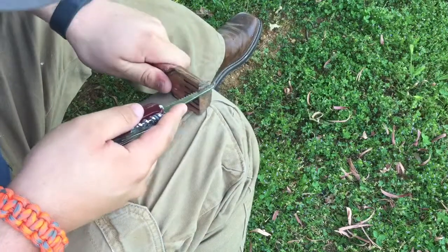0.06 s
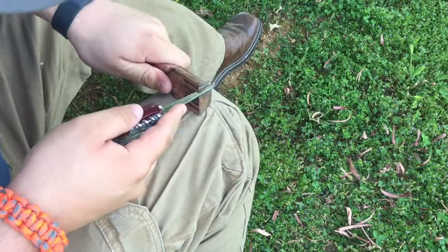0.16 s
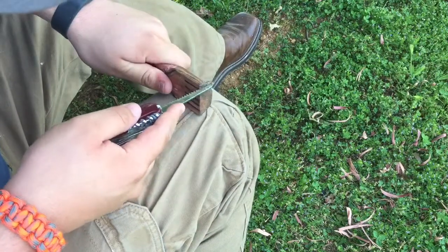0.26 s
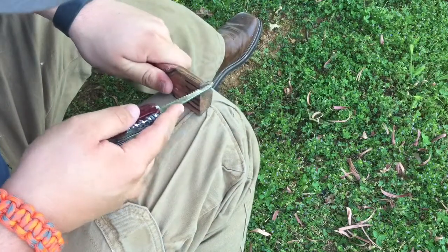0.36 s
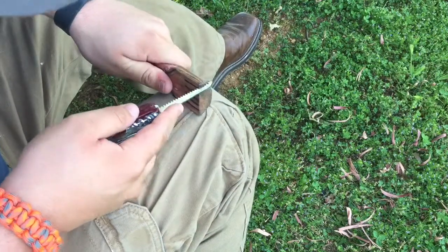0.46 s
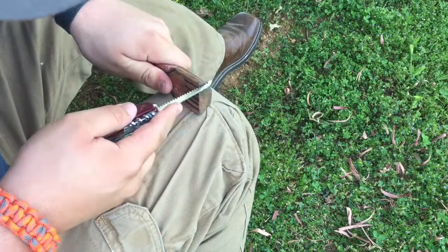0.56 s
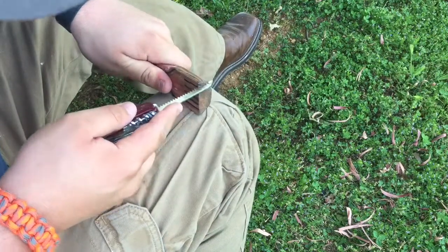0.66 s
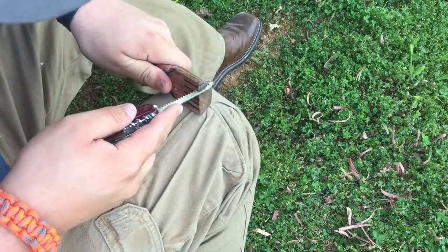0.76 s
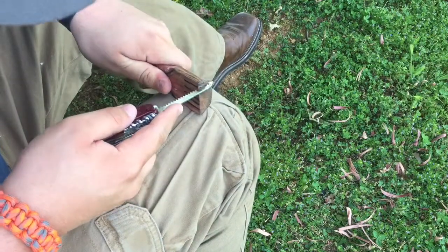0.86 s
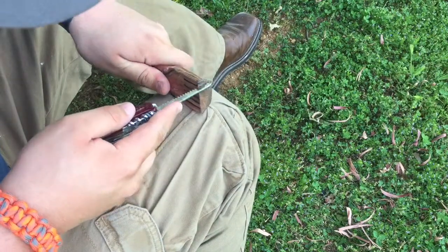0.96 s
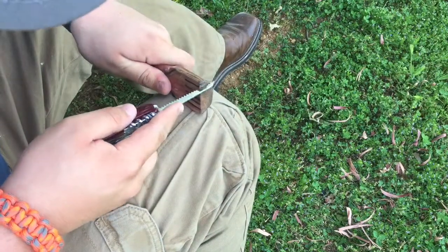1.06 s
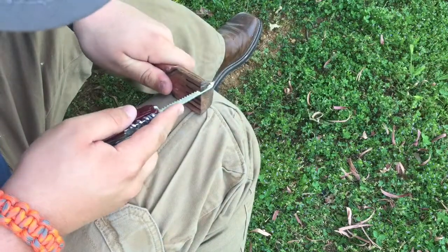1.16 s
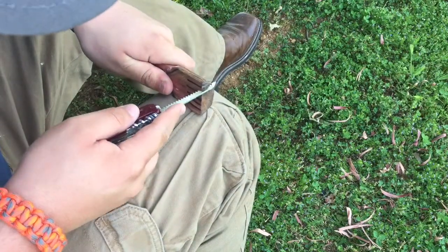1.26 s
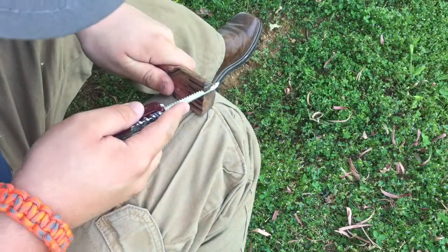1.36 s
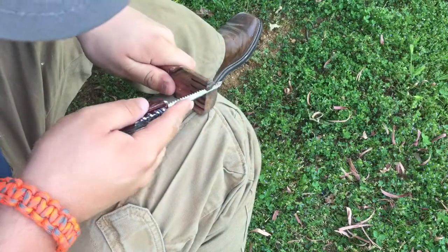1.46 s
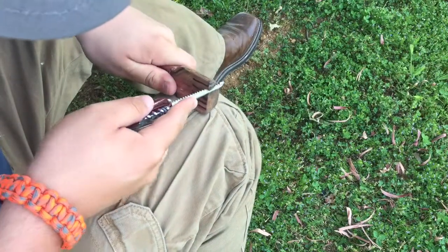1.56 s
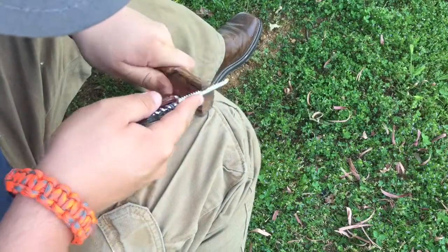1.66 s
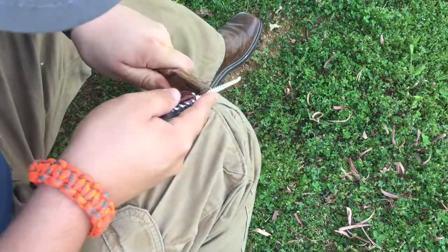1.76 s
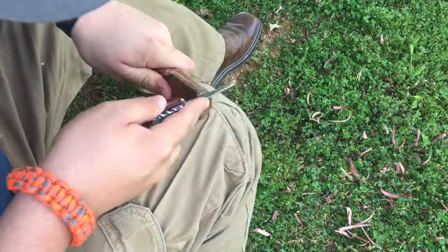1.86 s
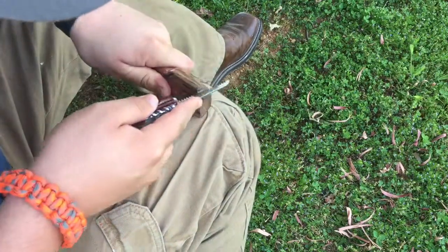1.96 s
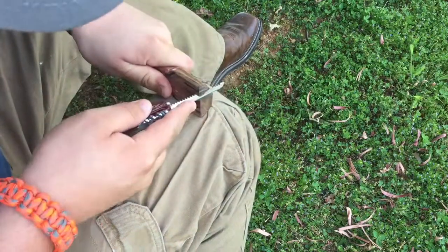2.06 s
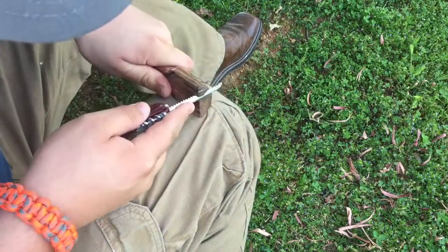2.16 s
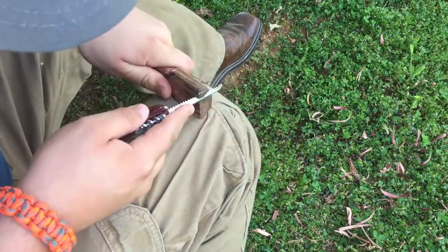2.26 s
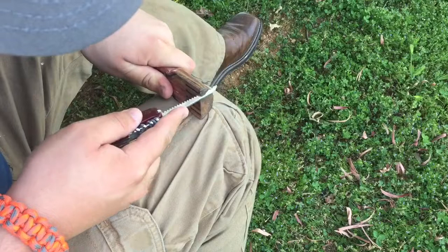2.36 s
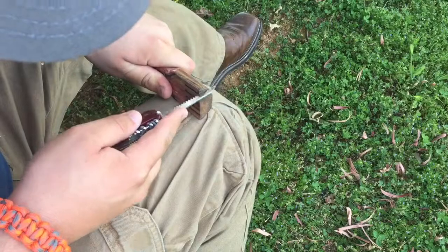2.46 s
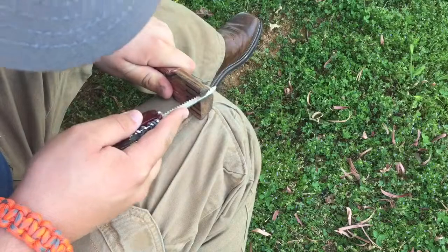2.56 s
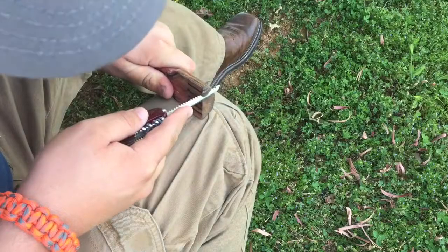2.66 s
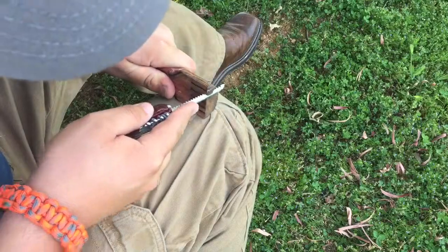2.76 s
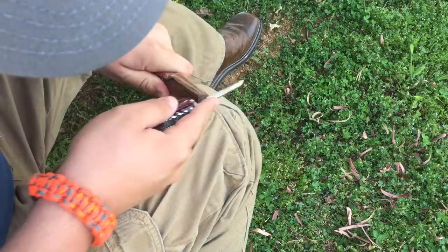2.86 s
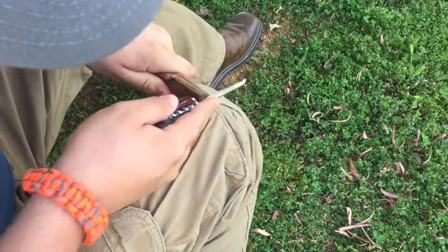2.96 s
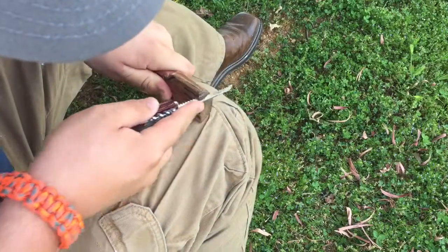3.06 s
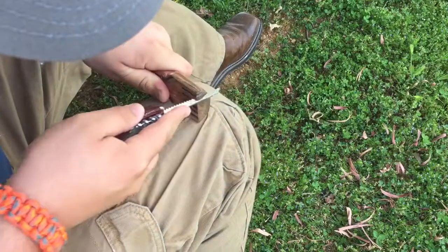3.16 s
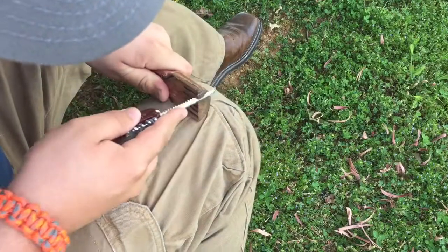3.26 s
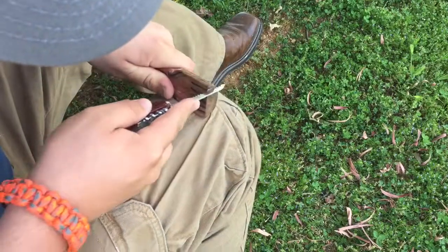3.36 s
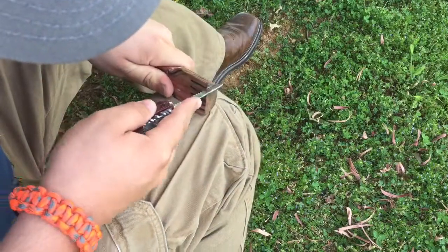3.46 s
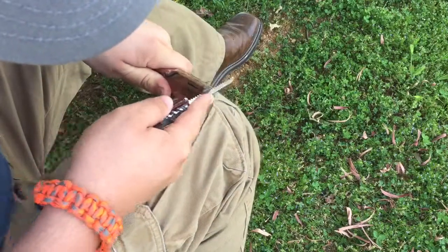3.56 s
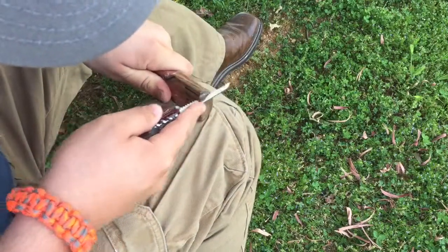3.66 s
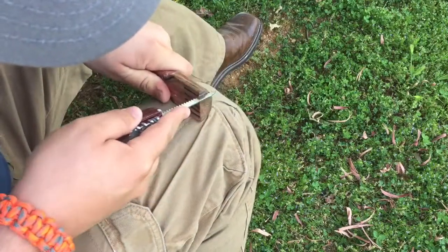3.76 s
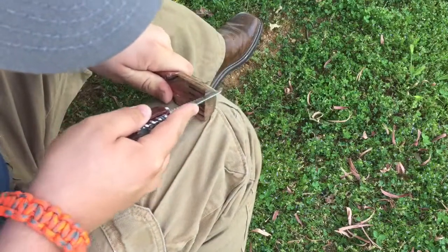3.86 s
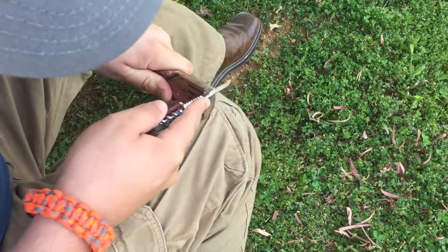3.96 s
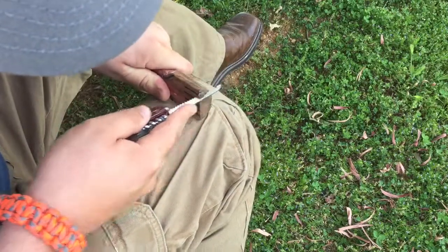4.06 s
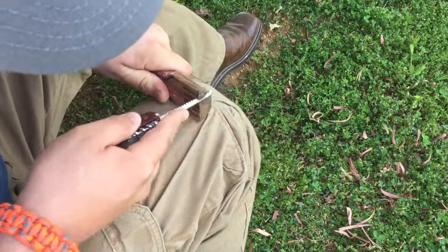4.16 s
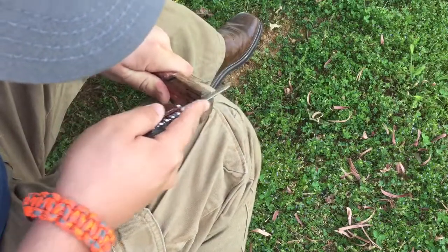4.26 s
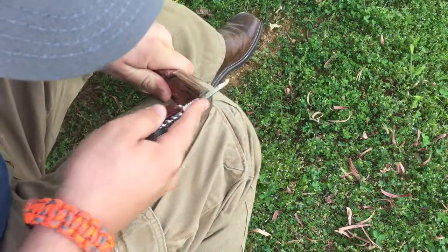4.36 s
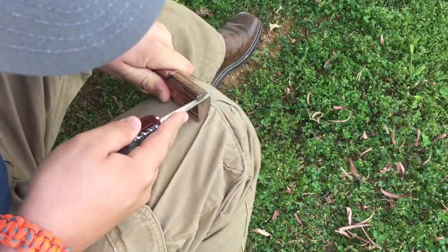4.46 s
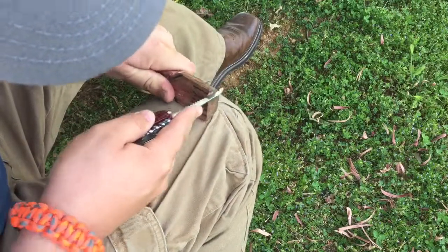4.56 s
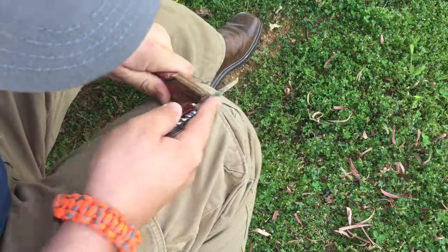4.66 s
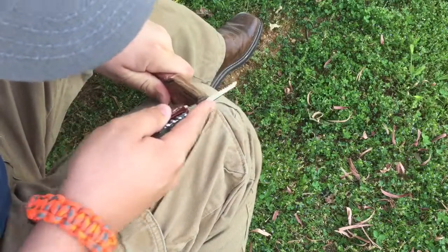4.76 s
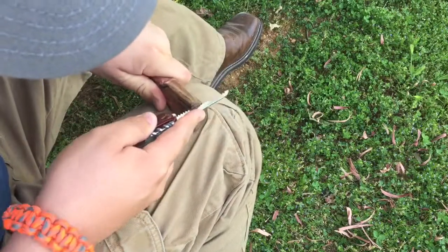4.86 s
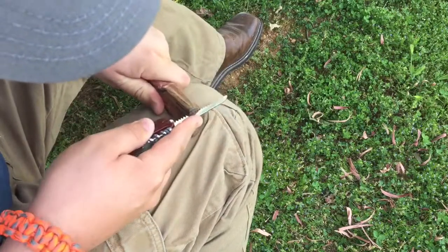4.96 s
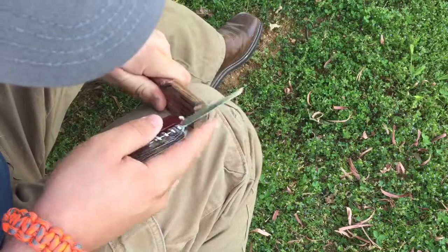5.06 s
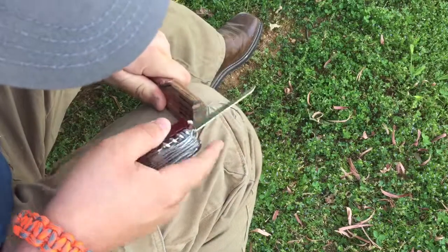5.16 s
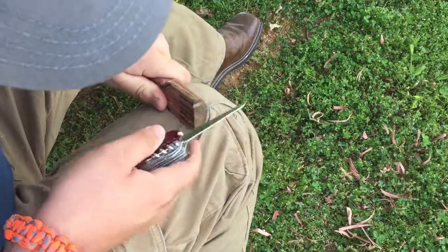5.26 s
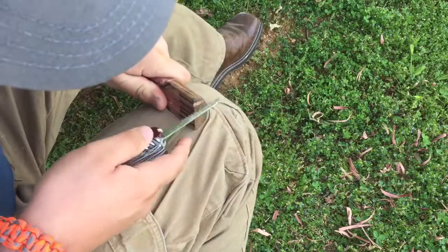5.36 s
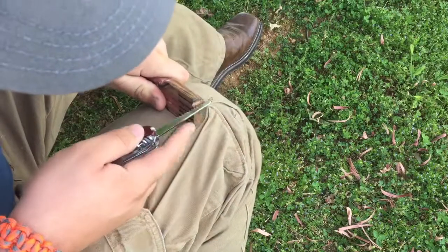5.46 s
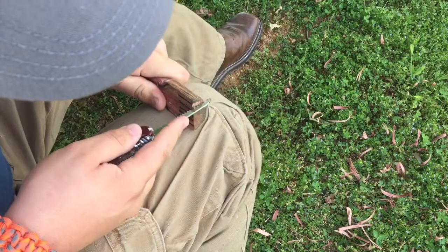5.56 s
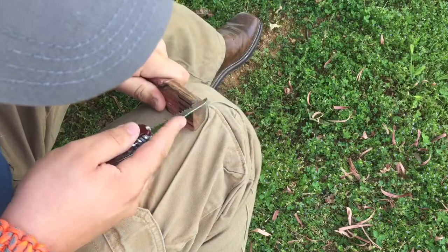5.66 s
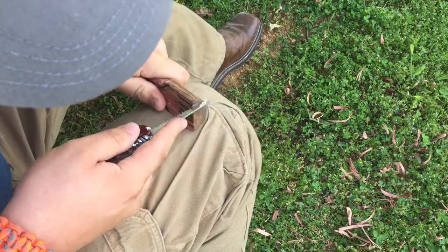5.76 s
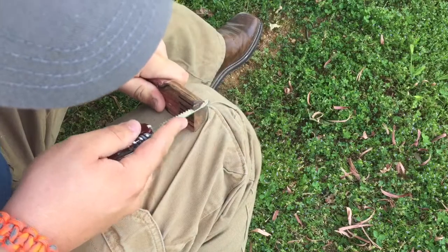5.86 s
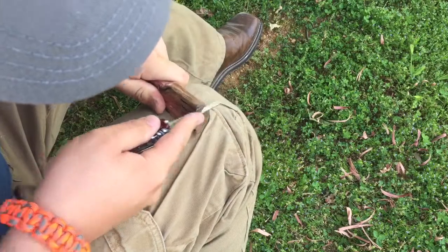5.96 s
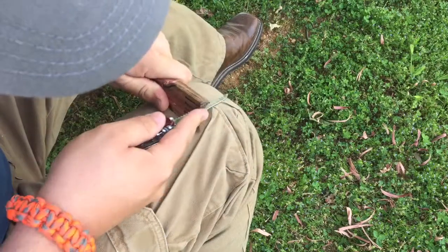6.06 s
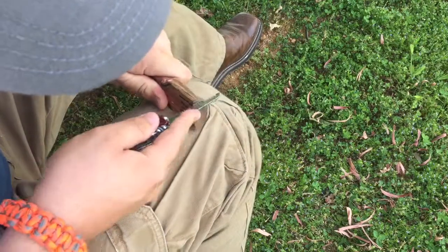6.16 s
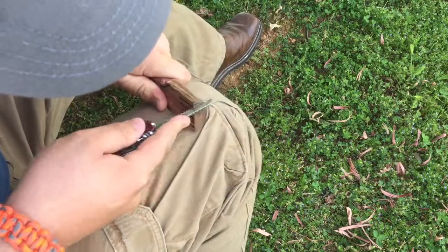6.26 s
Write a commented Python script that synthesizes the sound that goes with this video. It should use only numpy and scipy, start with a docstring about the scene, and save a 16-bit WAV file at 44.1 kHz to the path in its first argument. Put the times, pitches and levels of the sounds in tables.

```python
"""A small folding saw cuts in short, catching strokes into wood held on the knee, out on a lawn.
Each tooth that bites tears a burst of fibres, which makes the hand-damped wood ring briefly, and the
garden sends back a faint echo. Now and then the blade taps the wood or a hand brushes the trousers.
Behind it lie a low rumble, a distant hiss, a couple of faint birds and a far engine picking up speed."""
import sys
import numpy as np
from scipy import signal
from scipy.fft import rfft, irfft
from scipy.io import wavfile
from scipy.ndimage import uniform_filter1d

SR = 44100
rng = np.random.default_rng(int(sys.argv[2]) if len(sys.argv) > 2 else 0)


def master(y):
    """Save y as 16-bit WAV."""
    cut = np.clip(np.atleast_2d(y).T, -1, 1)
    pcm = np.round(cut * 32767)  # scale
    wavfile.write(sys.argv[1], SR, pcm.astype(np.int16))


N = 278712
TIME = np.arange(N) / SR
TOP_HZ = 16000

# How loud the rumble and the hiss are over time: t/s, level/dB
RUMBLE_LEVELS = [(0, -52), (.65, -50), (1.25, -56), (1.42, -47.5), (1.52, -51), (1.7, -50), (2.2, -53),
                 (2.55, -53), (3.17, -48), (3.45, -54), (3.8, -50.5), (3.88, -60.5), (4.25, -50),
                 (4.9, -53.5), (5.4, -57.5), (5.75, -61), (6.1, -51.5), (6.32, -52)]
HISS_LEVELS = [(0, -69), (1.2, -69.5), (2.5, -69), (4.9, -66.5), (5.4, -69), (6.32, -67.5)]
# How much low and high sound is in the rumble, hiss and cloth: f/Hz, relative level/dB
RUMBLE_SPECTRUM = [(12, -52), (20, -20), (31, -15), (54, 0.5), (80, -1), (150, -7.5), (177, -15),
                   (245, -17), (268, -16.5), (292, -25.5), (400, -37), (520, -64), (880, -120)]
HISS_SPECTRUM = [(190, -36.5), (330, -3), (363, 0), (568, -6.5), (757, -4), (1010, -4.5), (1150, -8),
                 (1320, -3.5), (1530, -8), (2100, -5.5), (2280, -8.5), (4600, -11), (15000, -22.5)]
CLOTH_SPECTRUM = [(200, -7), (600, -3), (2000, -0.5), (4500, -8.5), (7500, -4), (11000, -14), (16000, -16)]
# Bird notes: t/s, length/s, first f/Hz, last f/Hz, top level/dB, wobble/share of the pitch
BIRD_NOTES = [(0.096, 0.147, 3350, 3320, -71.5, .04), (0.138, .26, 4600, 4520, -81, .02),
              (.44, 0.48, 2256, 2430, -71, 0.016), (.752, .056, 2404, 2412, -53.5, 0.0073),
              (0.796, 0.072, 4880, 5010, -63, 0.0065), (.845, 0.096, 5034, 5050, -60, 0.0088),
              (3.308, 0.17, 2350, 2410, -78, 0.012), (3.425, 0.052, 2340, 2384, -55.5, 0.0068),
              (3.51, 0.073, 2400, 2370, -62.5, 0.0143), (3.49, 0.087, 4590, 4930, -68, .007),
              (3.545, 0.12, 4950, 4870, -69, .007)]
# A farther bird's falling calls: t/s, level/dB
FALLING_CALLS = [(2.21, -83), (2.59, -83), (2.94, -78), (3.27, -76), (3.58, -75), (6.05, -85)]
# The blade is set down on the wood or nudges it: t/s, peak level/dB
BLADE_TAPS = [(.1, -56), (.9, -52.5), (1.381, -37.5), (2.711, -48.5), (5.776, -58.5)]
# Resonances (pitches at which a thing rings) of such a tap: f/Hz, width/Hz, relative level/dB
TAP_RESONANCES = [(400, 160, 3), (550, 170, 1), (1350, 210, -1), (2350, 590, -19.5), (4170, 220, -20),
                  (5900, 2700, -33)]
# The far engine: t/s, f/Hz, level/dB, wobble/share of the pitch
ENGINE_HUM = [(.28, 156, -65, 0.012), (.35, 159.6, -57, .008), (.55, 170, -55, 0.0058),
              (.63, 169.7, -66.5, 0.017), (.73, 177, -55.5, 0.01), (.83, 192, -60, .008),
              (.98, 195, -86, .008)]
# The blade catches and a few teeth bite in a row before it jams or skips: t/s, length/s, teeth/count,
# first tooth's ring level/dB, fade to the last tooth/dB, knock above ring/dB, rasp above ring/dB
BLADE_CATCHES = [(0.301, 0.042, 1, -64, 0, -7, -10), (1.7146, 0.023, 3, -23, 10, -8, -7),
                 (1.7405, 0.0076, 1, -40, 0, 5.5, -3), (1.7552, 0.021, 3, -33, 0, 3, -6),
                 (1.7779, 0.025, 4, -36.5, 14, -0.5, -4), (1.877, 0.02, 2, -42.5, 1, 0.5, -7.5),
                 (1.923, 0.01, 1, -51.5, 4, -2, -4), (1.938, .021, 3, -38, 13.5, -1, -3),
                 (1.996, 0.0062, 1, -44, 0, 0, -6), (2.019, 0.0034, 1, -41, 0, 5, -10),
                 (2.0553, 0.067, 3, -52, 18, 1, -9), (2.348, 0.061, 5, -63, -4, 1, -8),
                 (2.407, 0.02, 2, -57, -2, -2, -11.5), (2.6744, 0.012, 1, -66, 0, 7, -5),
                 (2.789, 0.003, 1, -54, 0, 8, -6), (2.859, 0.023, 2, -26, 8.5, 1, -10.5),
                 (2.8892, 0.027, 3, -31, -3.5, -1.5, -7.5), (2.918, 0.025, 3, -37, 10, 7.5, 1),
                 (3.0624, 0.0045, 1, -36, 0, -1.5, -7), (3.0739, .01, 2, -36.5, -3.5, 4.5, -7.5),
                 (3.0941, .023, 3, -31, 5, 0.5, -12), (3.1228, 0.023, 2, -39, 13, -0.5, -7),
                 (3.1782, .044, 4, -40, 8, 0.5, -4.5), (3.2274, 0.031, 3, -44, 4.5, 0.5, -7),
                 (3.2616, 0.023, 2, -57, 4.5, -1, -8), (3.5497, 0.022, 3, -22.5, 10, -9.5, -12),
                 (3.5757, .021, 2, -40, 1.5, 5, -6), (3.726, 0.03, 2, -34, 9, -5, -9),
                 (3.7565, .058, 4, -32, 17.5, -5.5, -8), (3.9285, 0.0035, 1, -42, 0, -1, -5),
                 (3.9417, .031, 4, -34, -0.5, -3.5, -8), (4.0272, 0.0039, 1, -37, 0, 1.5, -5.5),
                 (4.1194, .033, 3, -29.5, 12.5, -3.5, -8.5), (4.1513, .028, 2, -40.5, 1.5, 0.5, -8),
                 (4.1887, 0.0048, 1, -42.5, 0, -7, -11), (4.2674, 0.0028, 1, -31.5, 0, -2, -12.5),
                 (4.2928, .024, 3, -22.5, 10, -7, -10), (4.328, 0.011, 2, -28.5, 2, -1.5, -6),
                 (4.456, .021, 3, -42.5, -8.5, 6.5, -1.5), (4.4758, .035, 5, -33, 3.5, -4.5, -7.5),
                 (4.5915, .003, 1, -51.5, 0, -6, -5), (4.6136, 0.0032, 1, -43, 0, -3, 3.5),
                 (4.657, 0.026, 4, -18, 16, -6.5, -7), (4.7016, .017, 2, -23.5, 8, -3, -7.5),
                 (4.7282, .005, 1, -36.5, -3, 8.5, -6), (4.833, 0.015, 2, -31, 4.5, -5, -11),
                 (5.057, 0.011, 1, -63, 4, 5, -12), (5.9415, 0.0047, 1, -47.5, -3, -1, -9),
                 (5.9692, 0.015, 2, -36, -2.5, -9.5, -6), (5.999, 0.021, 3, -37.5, -1, -6.5, -2.5),
                 (6.24, 0.016, 2, -56.5, -4, 3, -4), (6.2668, 0.0053, 1, -47.5, -5, 5, -0.5),
                 (6.281, 0.025, 3, -48, -0.5, 7.5, -4)]
# Contact point, grip and pressure change the wood's three main resonances with each stroke:
# t/s, first f/Hz, second f/Hz, third f/Hz, thud boost/dB, relative level of splintering/dB
SAW_STROKES = [(0, 800, 1380, 2040, 14, -20), (1.7, 790, 1365, 2060, -8, -17),
               (1.75, 817, 1410, 2020, -9.5, -19), (1.85, 800, 1440, 2040, -3, -15),
               (2.3, 710, 1450, 2050, 0, -25), (2.85, 816, 1390, 2010, -10.5, -14),
               (2.885, 815, 1430, 2040, -9.5, -34), (3.05, 812, 1440, 2005, -9.5, -47),
               (3.54, 815, 1396, 2080, -5.5, -16), (3.7, 820, 1460, 1980, -1, -31),
               (3.9, 780, 1460, 1940, -4.5, -10), (4.1, 850, 1450, 2060, -5.5, -33),
               (4.25, 834, 1406, 1950, -3, -7.5), (4.44, 830, 1450, 2000, -6.5, -12),
               (4.58, 810, 1430, 1910, -5.5, -5.5), (4.695, 830, 1440, 2050, -0.5, -11.5),
               (4.8, 863, 1435, 2030, -3, -11.5), (5.9, 815, 1394, 1970, -3, -6.5)]
# Those same three resonances: width/Hz, relative level/dB
MAIN_RESONANCES = [(260, 0), (230, 0), (240, 0)]
# Dull thud of the block in the hand: f/Hz, width/Hz, level before the stroke's boost/dB
THUD_RESONANCES = [(243, 290, 2), (383, 205, -1), (534, 360, 0)]
# High resonances of wood and blade: f/Hz, width/Hz, relative level/dB
HIGH_RESONANCES = [(1620, 77, -8), (2240, 830, -7), (2330, 210, -19), (3017, 120, -17.5),
                   (3360, 180, -14.5), (3746, 410, -12.5), (4080, 140, -13.5), (4448, 505, -11),
                   (5400, 200, -17.5), (5766, 640, -11.5), (6400, 200, -14), (7060, 1800, -18),
                   (8850, 2000, -25), (12200, 3400, -26.5), (14600, 2600, -29.5)]
# The hand brushes over the trousers: t/s, length/s, top level/dB
HAND_BRUSHES = [(1.62, 0.29, -64.5), (2.17, 0.055, -72), (4.82, 0.14, -67), (4.959, 0.028, -67),
                (4.953, 0.13, -73), (5.922, 0.19, -65.5)]


def undb(db):
    """Turn decibels into a number to multiply a sound by."""
    return 10 ** (np.asarray(db) / 20)


def unit(x):
    """Scale a signal so that its average size (rms) is 1."""
    return x / np.sqrt(np.mean(x ** 2))


def curve(rows):
    """Join timed points with straight lines, giving one curve for each column after the time."""
    s, *columns = np.transpose(rows)
    return [np.interp(TIME, s, column) for column in columns]


def add(track, s, sound):
    """Mix a sound into the track, starting s seconds in."""
    i = int(s * SR)
    track[i:i + len(sound)] += sound[:max(N - i, 0)]


def drift(per_s):
    """A smooth random wander of size 1 that picks a new value per_s times a second."""
    hold = int(SR / per_s)
    steps = np.repeat(rng.standard_normal(N // hold + 1), hold)
    return unit(uniform_filter1d(uniform_filter1d(steps, hold), hold)[:N])


def noise(spectrum):
    """Steady noise with the given balance of low and high sound."""
    hz, db = np.transpose(spectrum)
    f = np.maximum(np.fft.rfftfreq(N, 1 / SR), 1)
    gain = undb(np.interp(np.log(f), np.log(hz), db))
    return unit(irfft(rfft(rng.standard_normal(N)) * gain, N))


def swell(s, length):
    """One smooth rise and fall, starting s seconds in."""
    return np.sin(np.pi * np.clip((TIME - s) / length, 0, 1)) ** 2


def tone(hz, wobble, wobbles_per_s):
    """A plain tone that follows a pitch curve a little unsteadily."""
    pitch = hz * (1 + wobble * drift(wobbles_per_s))
    return np.sqrt(2) * np.sin(2 * np.pi * np.cumsum(pitch) / SR)


def rumble():
    """A low outdoor rumble that swells and sinks."""
    return noise(RUMBLE_SPECTRUM) * undb(curve(RUMBLE_LEVELS)[0] + 3 * drift(per_s=14))


def hiss():
    """A smooth, nearly steady hiss from far away."""
    return noise(HISS_SPECTRUM) * undb(curve(HISS_LEVELS)[0] - 0.5 * drift(per_s=4.1))


def birds(flutter_db=2, call_s=.11):
    """One bird's fluttering whistles and another's falling calls, blurred by the trees."""
    song = np.zeros(N)
    for s, length, first_hz, last_hz, db, wobble in BIRD_NOTES:
        glide = np.interp(TIME, [s, s + length], [first_hz, last_hz])
        song += undb(db) * swell(s, length) * tone(glide, wobble, wobbles_per_s=400)
    song *= undb(flutter_db * drift(per_s=63))
    t = np.arange(int(call_s * SR)) / SR
    call = 2 * np.hanning(len(t)) * signal.chirp(t, f0=2200, t1=call_s, f1=1720)
    for s, db in FALLING_CALLS:
        add(song, s, undb(db) * call)
    return song + undb(-9) * garden_echo(song, fade_s=.33, dull_hz=6000, build_s=0.0033)


def garden_echo(sound, fade_s, dull_hz, build_s, size=32768):
    """Ground, shrubs and trees scatter sound into a soft tail that drops 60 dB in fade_s."""
    t = np.arange(size) / SR
    build_up = 1 - np.exp(-(t / build_s) ** 2)
    tail = rng.standard_normal(size) * undb(-60 * t / fade_s) * build_up
    tail = signal.sosfilt(signal.butter(1, dull_hz, fs=SR, output="sos"), tail)
    return signal.fftconvolve(sound, tail / np.sqrt(np.sum(tail ** 2)))[:N]


def wood_ring(resonances, low_hz, high_hz, size=2048):
    """How the wood rings after one sharp push, between a low and a high frequency."""
    f = np.maximum(np.fft.rfftfreq(size, 1 / SR), 1)
    peaks = [undb(db) / (1 + (2 * (f - hz) / width) ** 2) for hz, width, db in resonances]
    edge_cut = (1 + (low_hz / f) ** 12) * (1 + (f / high_hz) ** 12)
    gain = np.sqrt(sum(peak ** 2 for peak in peaks) / edge_cut) + 1e-4
    # Fold the second half onto the first, so the ring comes after the push and never before it.
    cepstrum = irfft(np.log(gain))
    cepstrum[1:size // 2] *= 2
    cepstrum[size // 2 + 1:] = 0
    return irfft(np.exp(rfft(cepstrum)))[:size // 2]


def taps():
    """The blade knocks softly on the block, which rings for a moment."""
    ring = wood_ring(TAP_RESONANCES, low_hz=200, high_hz=12000)
    out = np.zeros(N)
    for s, db in BLADE_TAPS:
        add(out, s, undb(db) * ring / np.abs(ring).max())
    return out


def engine():
    """A far engine's hum rises in pitch as it gathers speed."""
    hz, db, wobble = curve(ENGINE_HUM)
    heard = (TIME > ENGINE_HUM[0][0]) * (TIME < ENGINE_HUM[-1][0])
    return tone(hz, wobble, wobbles_per_s=23.2) * undb(db) * heard


def wood_bands(stroke):
    """The low knock, middle ring and high rasp of the wood as it is held for one stroke."""
    _, *main_hz, thud_db, splinter_db = stroke
    resonances = [(hz, width, db) for hz, (width, db) in zip(main_hz, MAIN_RESONANCES)]
    resonances += [(hz, width, db + thud_db) for hz, width, db in THUD_RESONANCES]
    resonances += [(2370, 990, splinter_db)]  # the broad crack of splintering fibres
    resonances += HIGH_RESONANCES
    bands_hz = [(165, 1100), (1100, 3100), (3100, TOP_HZ)]
    return [wood_ring(resonances, low, high) for low, high in bands_hz]


def bites(hold_share=.66, timing_scatter=.02, depth_scatter_db=0.9, knock_scatter_db=2):
    """Teeth bite almost evenly through a catch: each gets a start, a length and three band levels."""
    for s, length, teeth, first_db, fade_db, knock_db, rasp_db in BLADE_CATCHES:
        spacing = length / teeth
        for k, (late, deep, hollow) in enumerate(rng.standard_normal((teeth, 3))):
            start = s + spacing * (k + timing_scatter * late * (k > 0))
            lost_db = fade_db * k / max(teeth - 1, 1)
            ring = first_db - lost_db + depth_scatter_db * deep
            # As a catch fades, knock and rasp lose less than the ring.
            knock = ring + knock_db + 0.46 * lost_db + knock_scatter_db * hollow
            rasp = ring + rasp_db + .2 * lost_db
            yield start, hold_share * spacing, (knock, ring, rasp)


def tooth_force(t, length, slide_db, snaps_per_s=3600, scatter_db=4.5,
                approach_s=0.0046, rise_s=0.0011, release_s=0.0016, run_out_s=0.0074):
    """One tooth slides up, grips at t = 0, snaps fibre after fibre as it rubs, and slips free."""
    before, held, after = np.maximum(-t, 0), np.maximum(t, 0), np.maximum(t - length, 0)
    grip = (1 - np.exp(-(held / rise_s) ** 2)) * np.exp(-.35 * held / length - after / release_s)
    slide = undb(slide_db) * np.exp(-before / approach_s - after / run_out_s)
    breaks = rng.random(len(t)) < snaps_per_s / SR
    snaps = breaks * undb(scatter_db * rng.standard_normal(len(t))) * rng.choice([-1, 1], len(t))
    rub = 0.24 * rng.standard_normal(len(t))
    return np.hypot(grip, slide) * (snaps + rub)


def saw(slide_db=-53.5):
    """The force of each biting tooth sets off the wood's knock, ring and rasp together."""
    t = np.arange(-.03, .06, 1 / SR)
    starts = [stroke[0] for stroke in SAW_STROKES]
    woods = [wood_bands(stroke) for stroke in SAW_STROKES]
    out = np.zeros(N)
    for s, length, levels_db in list(bites()):
        _, ring_db, _ = levels_db
        # Sliding is about equally loud for all teeth, so hard bites stand out from it more.
        force = tooth_force(t, length, min(slide_db - ring_db, -15))
        bands = woods[np.searchsorted(starts, s) - 1]
        for band, db in zip(bands, levels_db):
            sound = signal.fftconvolve(force, band)
            average_size = np.sqrt(np.sum(sound ** 2) / (length * SR))  # over the bite's length
            add(out, s + t[0], undb(db) * sound / average_size)
    return out


def cloth(grain_db=3):
    """The trousers give a soft, grainy rustle as the hand rubs over them."""
    rubbing = sum(undb(db) * swell(s, length) for s, length, db in HAND_BRUSHES)
    return noise(CLOTH_SPECTRUM) * rubbing * undb(grain_db * drift(per_s=300))


def scene(near_db=-34.0, far_db=-48.5):
    """The saw close by, its echoes off legs, ground and garden, and the quiet sounds around it."""
    sawing = saw() + taps()
    near = undb(near_db) * garden_echo(sawing, fade_s=0.19, dull_hz=3530, build_s=0.0047)
    far = undb(far_db) * garden_echo(sawing, fade_s=0.54, dull_hz=3000, build_s=.02)
    return (sawing + near + far + cloth() + birds() + rumble() + hiss() + engine())[None]


def record(dry):
    """Cut away the very highest treble."""
    return signal.sosfilt(signal.ellip(10, .2, 80, TOP_HZ, fs=SR, output="sos"), dry)


dry = scene()
out = record(dry)
master(out)
```